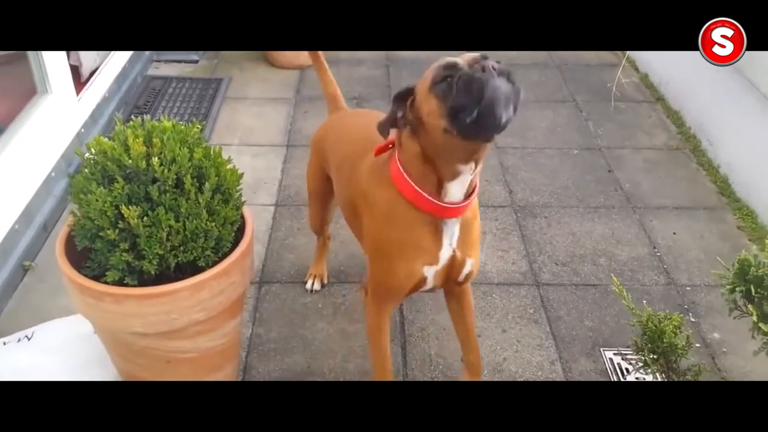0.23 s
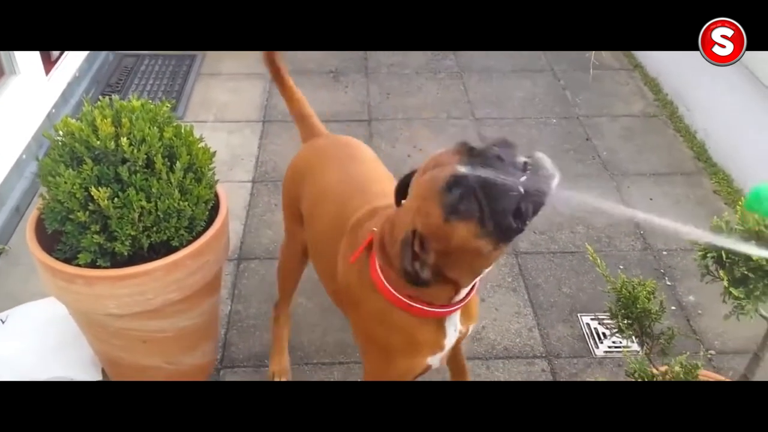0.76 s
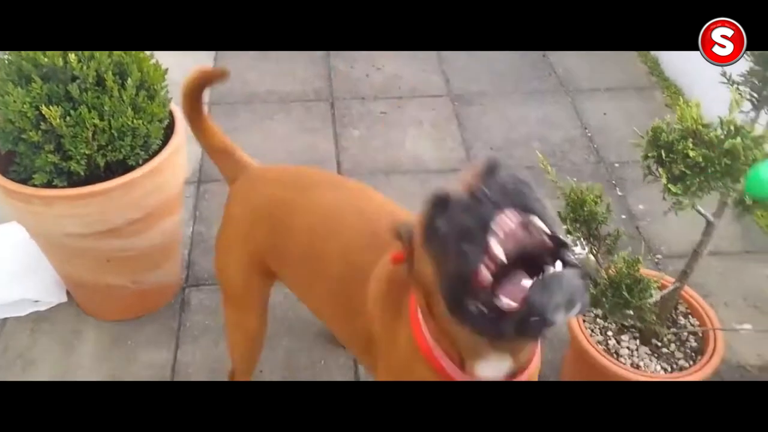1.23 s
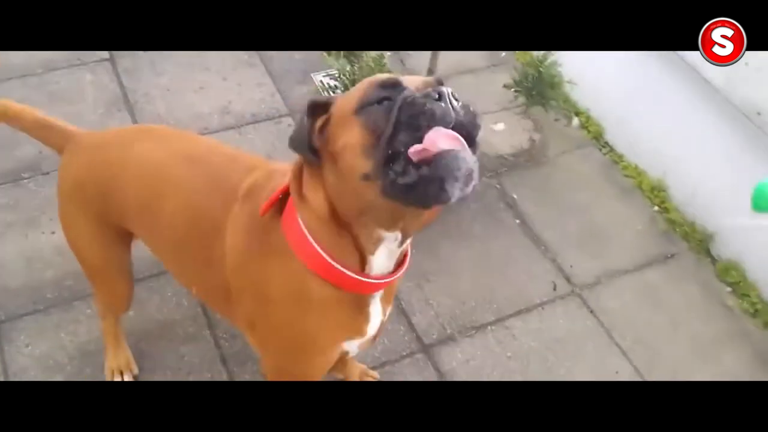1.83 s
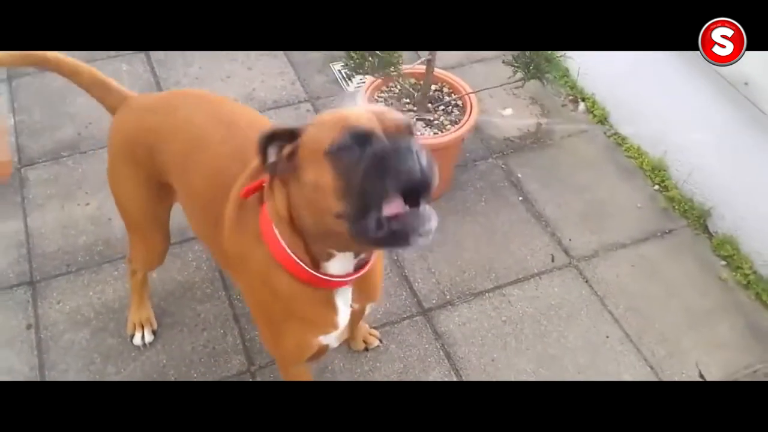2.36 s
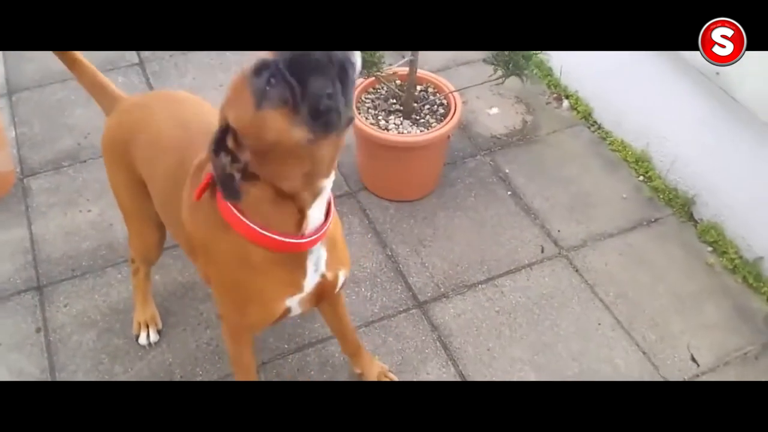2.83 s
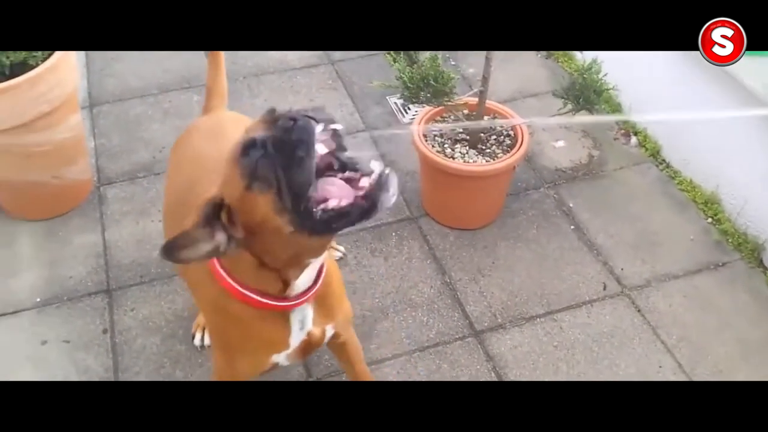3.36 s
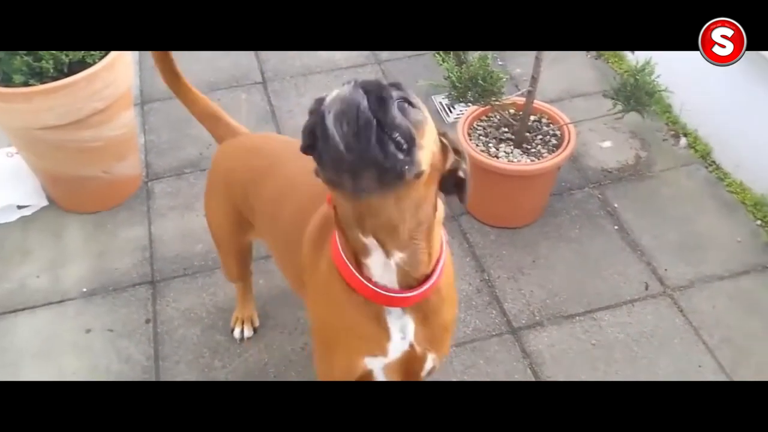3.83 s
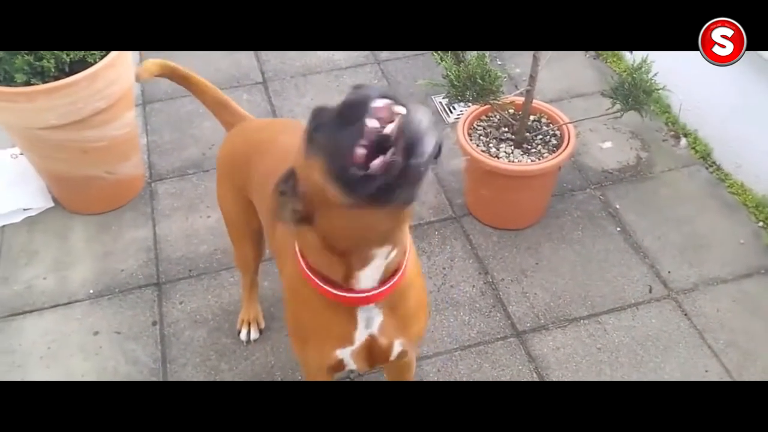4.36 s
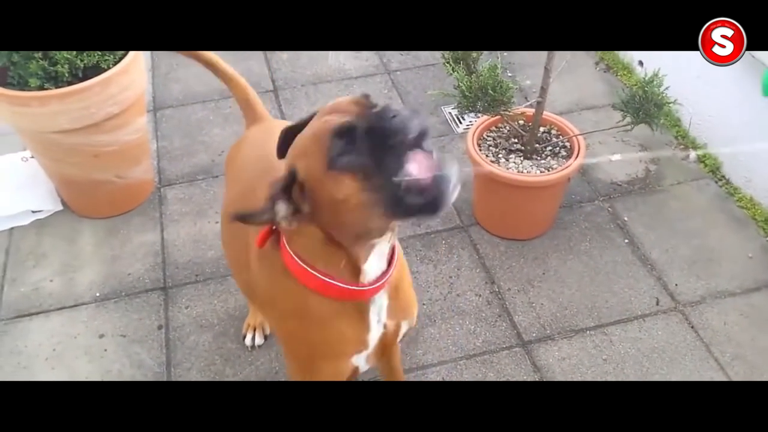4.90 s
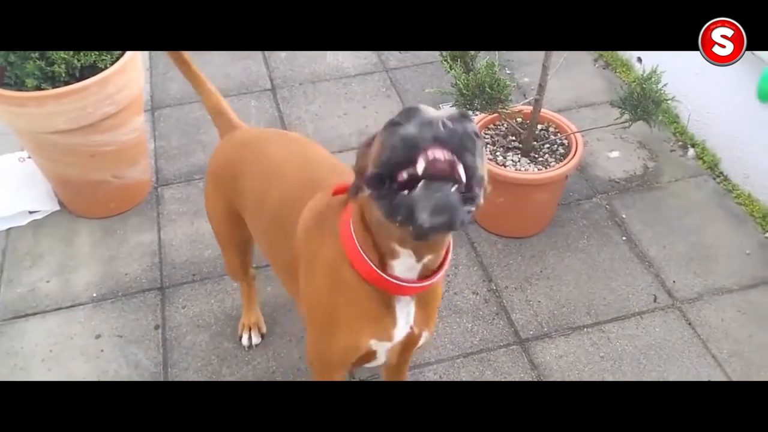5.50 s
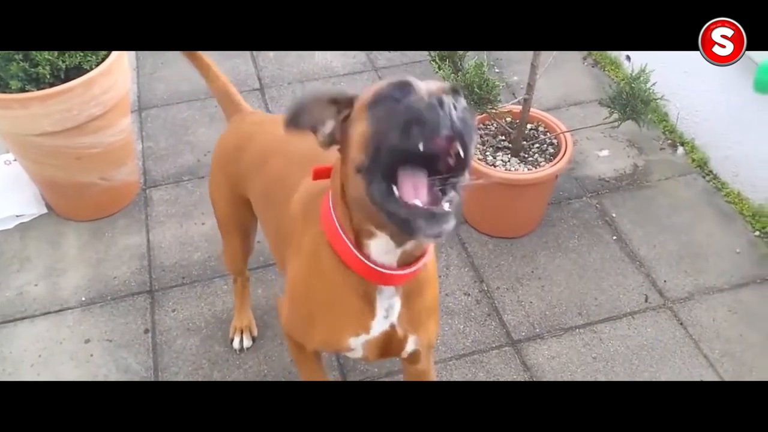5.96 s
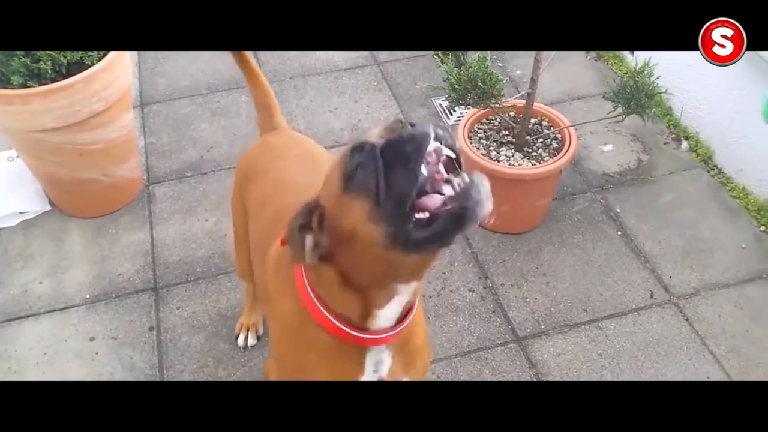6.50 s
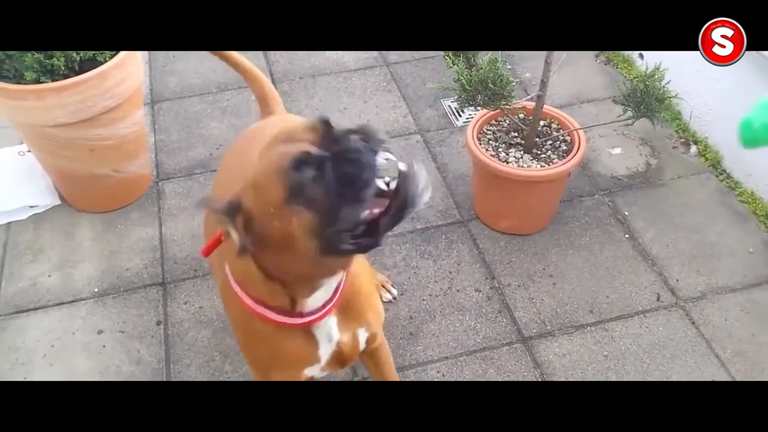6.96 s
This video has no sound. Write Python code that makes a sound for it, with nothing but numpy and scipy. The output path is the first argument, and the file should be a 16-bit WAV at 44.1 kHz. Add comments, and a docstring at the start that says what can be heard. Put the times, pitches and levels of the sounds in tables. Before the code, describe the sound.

Close by, a plastic trigger squirter fires quick hissing jets, each followed by a short suction squeak and hard clack. A dog's jowls clap and slosh at the water with hollow bubbly gulps and sharp wet ticks. Drops patter on patio slabs over a faint distant hum; soft wind bumps touch the microphone, mostly at left.

```python
"""On a paved patio a dog snaps at the jet of a trigger squirter, about three squirts a second.
Each squeeze clicks and hisses at the nozzle; the sprung piston returns, sucks water and clacks home.
The dog's jowls clap, slosh and spit: bubbles and noise ring the resonances of the mouth.
Water patters on the slabs over a distant hum, and a breeze bumps the microphone.
Turbulence is shaped noise, impacts excite decaying modes, and a diffuse tail answers from the walls."""
import sys
import numpy as np
from scipy import signal
from scipy.fft import rfft, irfft, next_fast_len
from scipy.io import wavfile
from scipy.ndimage import uniform_filter1d, map_coordinates

SR = 44100
rng = np.random.default_rng(int(sys.argv[2]) if len(sys.argv) > 2 else 0)


def bounce(signal):
    """Save signal as a 16-bit WAV file at the path given by the first command-line argument."""
    frames = np.transpose(np.atleast_2d(signal))
    limited = np.clip(frames, -1, 1)
    pcm = np.round(limited * 32767).astype(np.int16)
    wavfile.write(sys.argv[1], SR, pcm)


N = 318402
TIME = np.arange(N) / SR
SIZE = next_fast_len(N + SR)
HZ = np.fft.rfftfreq(SIZE, 1 / SR)

# trigger squeezes: (start [s], relative hiss level from pressure [dB], relative trigger click level [dB],
# relative nozzle spit level [dB], delay of the valve's glug [s], glug level [dB])
SQUEEZES = [(-0.04, 1, -16, -28, 0.044, -25.5), (0.333, -1.5, -14, -11, 0.048, -26),
            (0.698, -2.5, -12, -18, .047, -43), (1.062, -3.5, -17, -13, 0.067, -36),
            (1.467, -3, -20, -29, .052, -31), (1.897, -3.5, -16, -7, .05, -33),
            (2.274, -1.5, -11.5, -9, 0.053, -30.5), (2.602, 1, -10.5, -6, 0.066, -42),
            (2.975, 1, -12, -24, 0.037, -33), (3.29, 1, -4.5, -16, 0.06, -26.5),
            (3.6, 3, -2.5, -11, .056, -23.5), (3.913, 4, -6.5, -8, 0.051, -22),
            (4.241, -2.5, -2, -9, 0.06, -35), (4.527, -1.5, -26, -10, 0.032, -38),
            (4.82, 2, -19, -12, 0.036, -35), (5.109, -0.5, -8, -7, .04, -38),
            (5.381, 2.5, -9, -10, .047, -26.5), (5.634, 1, -5, -8, 0.043, -26.5),
            (5.879, -1, -7, -12, 0.055, -32), (6.12, -1, -21, -8, 0.042, -28),
            (6.363, 2, -24, -8, 0.042, -35), (6.602, -1, -13, -5, 0.036, -37),
            (6.827, 0, -21, -8, 0.054, -28), (7.059, -2, -7, -4.5, 0.052, -29)]
# trigger returns: (start [s], travel time [s], relative opening click level [dB],
# relative closing clack level [dB])
RETURNS = [(0.148, 0.018, -21.5, -19), (0.537, 0.023, -19, -19.5), (0.914, 0.025, -24.5, -22),
           (1.293, 0.03, -17.5, -19.5), (1.694, 0.021, -23, -23), (2.09, 0.025, -20.5, -24),
           (2.466, 0.022, -19, -21.5), (2.803, 0.022, -18, -19.5), (3.176, 0.021, -18, -20.5),
           (3.494, 0.021, -17, -18), (3.785, 0.035, -17.5, -18), (4.105, 0.026, -16, -21),
           (4.448, 0.021, -20, -21), (4.726, 0.02, -17, -18), (5.009, 0.019, -17.5, -16.5),
           (5.304, 0.016, -19.5, -24), (5.56, 0.021, -16, -19), (5.809, 0.02, -17, -18),
           (6.056, 0.021, -21, -18.5), (6.308, 0.016, -17, -19), (6.546, 0.022, -17.5, -20),
           (6.783, 0.021, -17, -22.5), (7.007, 0.018, -21, -23)]
# spectrum of hard contacts: (frequency [Hz], relative level [dB])
CONTACT_SPECTRUM = [(300, -30), (900, -1.5), (2000, 1), (3500, 7), (4400, 7), (6000, -4.5), (9500, 7),
                    (14000, -7.5)]
# left-right correlation of the squirter's noise: (frequency [Hz], correlation [0-1])
TOY_CORRELATION = [(900, 0.82), (3300, 0.49), (5000, 0), (7500, 0)]
CLICK_LIFE_S = .0012


def amp(db):
    """Logarithmic level: decibels become an amplitude ratio."""
    return 10 ** (np.asarray(db) / 20)


def unit(x):
    """Power normalisation: scale to rms 1."""
    return x / np.sqrt(np.mean(x ** 2) + 1e-20)


def along(points, hz):
    """Logarithmic frequency scale: interpolate (Hz, value) points on it."""
    f, v = np.transpose(points)
    return np.interp(np.log(hz + 1), np.log(f + 1), v)


def curve(rows):
    """Slow envelope: interpolate (time, value) rows at every sample."""
    s, values = np.transpose(rows)
    return np.interp(TIME, s, values)


def wobble(rate, reach=2):
    """Band-limited fluctuation: a smooth random curve with rate knots a second, clipped at reach."""
    knots = rng.standard_normal(int(N * rate / SR) + 4)
    return np.clip(map_coordinates(knots, [TIME * rate], order=2), -reach, reach)


def add(track, s, sound):
    """Superposition: sum a sound into a track from time s."""
    part = track[..., max(0, round(s * SR)):][..., :sound.shape[-1]]
    part += sound[..., :part.shape[-1]]


def body(spectrum):
    """Minimum phase: a folded cepstrum gives a causal response of mean power 1."""
    cepstrum = irfft(np.log(unit(amp(along(spectrum, HZ)))), SIZE)
    cepstrum[1:SIZE // 2] *= 2
    cepstrum[SIZE // 2 + 1:] = 0
    return np.exp(rfft(cepstrum))


def patchy(x, depth_db):
    """Spectral fluctuation: fleeting narrow bands rise and fall, so the colour keeps shifting."""
    z = signal.stft(x, nperseg=512)[2]
    field = uniform_filter1d(rng.standard_normal(z.shape[1:]), size=3, axis=0)
    field = uniform_filter1d(field, size=7, axis=1)
    coloured = signal.istft(z * amp(depth_db * unit(field)), nperseg=512)[1]
    return unit(coloured[:, :N])


def rush(level, spectrum, alike, grain_db, grain_rate, patchy_db):
    """Turbulence: grainy noise on a level curve excites a fixed body, partly correlated in stereo."""
    grain = unit(amp(grain_db * wobble(grain_rate)))
    drive = level * grain * patchy(rng.standard_normal((2, N)), patchy_db)
    # this rotation between mid and side gives the wanted correlation
    turn = np.arccos(np.clip(along(alike, HZ), 0, 1)) / 2
    shaped = rfft(drive, SIZE) * body(spectrum) * [np.cos(turn), np.sin(turn)]
    mid, side = irfft(shaped, SIZE)[:, :N]
    return np.array([mid + side, mid - side])


def blows(rows, life):
    """Impact envelope: each (s, dB) blow swells quickly and decays exponentially over life seconds."""
    attack_s = .0005
    level, t = np.zeros(N), np.arange(SR // 10) / SR
    for s, db in rows:
        add(level, s, amp(db) * np.exp(-t / life) * (1 - np.exp(-t / attack_s)))
    return level


def plop(hz, cycles, glide, attack_cycles):
    """Air cavity: a damped oscillation whose pitch slides as the cavity changes size."""
    turns = hz * np.arange(SR // 8) / SR
    shape = np.exp(-turns / cycles) * (1 - np.exp(-turns / attack_cycles)) ** 2
    pitch = hz * (1 + glide * np.tanh(turns / cycles - 1))
    return shape / shape.max() * np.sin(2 * np.pi * np.cumsum(pitch) / SR)


def cavity(x, hz, q):
    """Simple resonator: one peak that keeps the power of white noise."""
    b, a = signal.iirpeak(min(hz, SR / 3), max(q, .7), SR)
    return signal.lfilter(b, a, x) / np.sqrt(b[0])


def moving_cavity(x, hz, q):
    """Time-varying resonator: shift the pitch curve to zero frequency, smooth, and shift back."""
    turn = np.exp(2j * np.pi * np.cumsum(hz) / SR)
    pole = np.exp(-np.pi * hz.mean() / (q * SR))
    return (turn * signal.lfilter([1], [1, -pole], x / turn)).real


def droplets(level, hz, cycles, count):
    """Drop impacts: tiny decaying rings at random times, each of its own pitch, size and place."""
    start = rng.integers(0, N, count)
    pitch, size, place = rng.standard_normal((3, count, 1))
    n = np.arange(SR // 200)
    turns = np.minimum(hz * np.exp(.45 * pitch), SR / 3) * n / SR
    rings = amp(1.74 * np.minimum(size, 2)) * np.exp(-turns / cycles) * np.sin(2 * np.pi * turns)
    index = (start[:, None] + n).ravel()
    channels = [np.bincount(index, (rings * amp(side * place)).ravel(), N)[:N] for side in (-3, 3)]
    return level * unit(np.array(channels))


def plastic(rows, tilt_db, damping):
    """Modal vibration: each (s, dB) blow excites the head's modes anew; tilt is in dB per octave."""
    # modes of the plastic head: (frequency [Hz], relative level [dB], t60 at damping 1 [s])
    modes = [(920, -9, 0.029), (1556, -1.5, 0.026), (2793, 5.5, 0.055), (3416, 6.5, 0.049),
             (4290, -1, 0.023), (5050, -2, 0.041), (5270, 2.5, 0.021), (7030, -3.5, 0.024),
             (10200, -8, 0.0067), (9500, 15, 0.0052)]
    out, t = np.zeros(N), np.arange(SR // 16) / SR
    hz, db, t60 = np.transpose(modes)[:, :, None]
    for s, blow_db in rows:
        strength, detune, phase = rng.standard_normal((3, len(modes), 1))
        gain = amp(db + 6.1 * strength + tilt_db * np.log2(hz / 3000))
        decay = amp(-60 * damping * t / t60)
        tones = np.sin(2 * np.pi * (hz * (1 + 0.017 * detune) * t + phase))
        ring = (gain / np.linalg.norm(gain) * decay * tones).sum(0)
        add(out, s, amp(blow_db) * ring * (1 - np.exp(-t / 0.00027)))
    return out


def squeezes():
    """Pressure-driven jet noise: it builds to a crest, sags and collapses, with a sizzle on top."""
    # spectrum of the water jet: (frequency [Hz], relative level [dB])
    jet_spectrum = [(300, -10), (520, -18.5), (750, 5), (950, 6), (1300, 3.5), (2400, -0.5), (3400, 11),
                    (3900, 4.5), (4700, 9), (5800, 5.5), (7500, 7.5), (10000, -3)]
    # spectrum of the fine sizzle: (frequency [Hz], relative level [dB])
    sizzle_spectrum = [(4000, -56), (7000, -8), (8700, 1), (9800, 1.5), (10900, -6), (11700, 4),
                       (13000, -4.5), (14400, -8), (14900, -37), (15700, -6)]
    # the jet is louder while the nozzle is held nearer: (time [s], relative level [dB])
    jet_level = [(0, -41.5), (1.3, -38), (2.8, -42.5), (3.7, -35.5), (4.8, -35.5), (5.8, -37.5), (7.2, -38)]
    hold_s = 0.072  # the piston bottoms out and the squirt ends this long before the trigger is let go
    spit_s, crest_s = 0.037, 0.09  # after the start: the nozzle spits, the pressure crests
    fastest_rise_s = 0.0052  # for a 0 dB click; a gentler pull builds more slowly
    fall_s, tail_s = 0.02, 0.021
    nozzle_hz = 9940

    jet, sizzle, glugs = np.zeros((3, N))
    let_go = [s for s, *_ in RETURNS] + [N / SR + hold_s]
    for (s, pressure_db, click_db, _, delay, glug_db), end in zip(SQUEEZES, let_go):
        length = max(end - hold_s - s, .1)
        crest = min(crest_s, length - fall_s - .002)
        rise = min(fastest_rise_s * amp(-click_db / 2), spit_s)
        knots = s + np.array([-.003, rise, spit_s, crest, length - fall_s, length + fall_s, length + tail_s])
        jet += amp(np.interp(TIME, knots, [0, 4, 2.0, 3.5, 1.1, -2, -53], -120, -120))
        sizzle_db = np.interp(TIME, knots, [-30, -10, -9.5, 0.8, -3, -12, -42], -120, -120)
        sizzle += amp(-26 + pressure_db + sizzle_db)
        glug = plop(950 * np.exp(rng.normal(0, 0.033)), cycles=3.3, glide=0.063, attack_cycles=0.66)
        add(glugs, s + delay, amp(glug_db) * glug)
    jet *= amp(curve(jet_level) + wobble(16))

    # a narrow hiss at the nozzle wanders in pitch
    wandering_hz = nozzle_hz * np.exp(0.091 * wobble(13))
    nozzle = amp(-4.5) * sizzle * unit(moving_cavity(rng.standard_normal(N), wandering_hz, q=19))
    spits = [(s + spit_s + rng.normal(0, 0.0022), db) for s, _, _, db, *_ in SQUEEZES]
    sizzle += blows(spits, CLICK_LIFE_S)

    water = rush(jet * amp(1.44 * wobble(70)), jet_spectrum, TOY_CORRELATION,
                 grain_db=3.5, grain_rate=450, patchy_db=4)
    mist = rush(sizzle * amp(-1.26 + 1.1 * wobble(110)), sizzle_spectrum, TOY_CORRELATION,
                grain_db=4.0, grain_rate=1200, patchy_db=1.0)
    spatter = droplets(amp(-5) * jet, hz=4300, cycles=5, count=3200)
    spatter += droplets(amp(-14.5) * sizzle, hz=9400, cycles=2.7, count=1800)

    trigger = [(s, db) for s, _, db, *_ in SQUEEZES]
    clicks = rush(amp(-5) * blows(trigger, CLICK_LIFE_S), CONTACT_SPECTRUM, TOY_CORRELATION,
                  grain_db=1.5, grain_rate=1400, patchy_db=2.5)
    ring = amp(-14.0) * plastic(trigger, tilt_db=7, damping=2.7)
    return water + mist + nozzle + spatter + clicks + ring + glugs


def outdoors():
    """Random drop impacts: each squirt rains onto the slabs after its flight, over a steady distant hum."""
    # patter level as the slabs get wetter: (time [s], relative level [dB])
    wetness = [(0, -38), (0.6, -36), (1.0, -39.5), (1.4, -37), (1.8, -39.5), (2.25, -44), (2.7, -36),
               (3.4, -36.5), (3.75, -36), (4.2, -34), (4.7, -39), (5.1, -37), (5.7, -31.5), (6.3, -36),
               (6.7, -32), (7.2, -36.5)]
    # spectrum of the patter: (frequency [Hz], relative level [dB])
    patter_spectrum = [(500, -8.5), (1500, -6.5), (3200, -2.5), (4500, -1.5), (6500, -1), (9500, 0.5),
                       (14000, -9.5)]
    # spectrum of the hum: (frequency [Hz], relative level [dB])
    hum_spectrum = [(20, -17), (45, -3.5), (110, -1.5), (250, -1), (450, -10), (850, -5), (1500, -13.5),
                    (4000, -31)]
    flight_s, landing_db = 0.22, 4
    landing = sum(np.exp(-((TIME - s - flight_s) / 0.065) ** 2) for s, *_ in SQUEEZES)
    level = amp(curve(wetness) + landing_db * landing)
    patter = rush(level, patter_spectrum, [(1000, 0.034)], grain_db=3, grain_rate=800, patchy_db=2.5)
    drops = droplets(amp(-18) * level, hz=3600, cycles=3, count=1500)
    hum = rush(amp(-46), hum_spectrum, [(200, 1.0), (1500, 0.39)],
               grain_db=3, grain_rate=64, patchy_db=3.5)
    return amp(-9.0) * patter + drops + hum


def breeze():
    """Wind turbulence: gusts swell over calm air, stronger at the left port, and eddies bump it."""
    # gusts: (crest [s], relative rumble level [dB], rise time constant [s], fall time constant [s])
    gusts = [(1.87, -27.5, 0.038, 0.092), (2.18, -28, 0.037, 0.021), (3.34, -35.5, 0.029, 0.052),
             (3.96, -23.5, 0.058, 0.064), (4.39, -23, 0.14, 0.33), (5.3, -36.5, 0.056, 0.24),
             (5.73, -38, 0.12, 0.79), (6.12, -35, 0.1, 0.17), (6.85, -42, 0.35, 0.58)]
    # the strongest eddies: (time [s], relative peak level [dB], central frequency [Hz], left over right [dB])
    puffs = [(1.718, -22.5, 132, 21), (2.188, -20, 112, 22), (3.91, -15.5, 164, 30), (3.98, -16.5, 90, 28),
             (4.09, -16, 131, 11), (4.273, -22.5, 112, 16), (4.319, -28, 106, -4), (4.388, -15, 124, -7),
             (4.437, -18, 126, 3), (4.472, -16.5, 116, -5), (4.624, -12.5, 156, 24),
             (4.642, -18.5, 182, 16), (6.076, -17.5, 127, 22), (6.145, -20.5, 101, 30)]
    # spectrum of the rumble: (frequency [Hz], relative level [dB])
    rumble_spectrum = [(20, -22), (50, -1.5), (110, -1.5), (200, -12), (400, -25.5), (1000, -58.5)]
    calm_db = -52.5
    swells = [amp(db) * np.exp(np.minimum((TIME - s) / rise, (s - TIME) / fall))
              for s, db, rise, fall in gusts]
    strength = np.maximum(amp(calm_db), np.max(swells, axis=0))
    wind = rush(strength, rumble_spectrum, [(100, 0.18)], grain_db=3.0, grain_rate=130, patchy_db=2.5)
    bumps = np.zeros((2, N))
    for s, db, hz, left_db in puffs:
        share = amp([[left_db], [0]])
        bump = plop(hz, cycles=.7, glide=-.2, attack_cycles=.4)
        add(bumps, s - .003, amp(db) * share / share.mean() * bump)
    return wind * amp([[.8], [-2.7]]) + bumps


def crackle(per_s, noise_share):
    """Poisson-like impulses: equal bursts at random moments over some noise, at rms 1."""
    chance, sign = rng.random(N), rng.choice([-1, 1], N)
    bursts = unit(sign * (chance < per_s / SR))
    return np.sqrt(1 - noise_share) * bursts + np.sqrt(noise_share) * rng.standard_normal(N)


def jaws():
    """Cavity resonance: bubbles ring the closing mouth at a climbing pitch; jowls clap and fling spray."""
    # jowls clapping shut on air and water: (time [s], relative clap level [dB], mouth cavity frequency [Hz],
    # its decay time [s], relative slosh level [dB], slosh length scale [s], climb in pitch [octaves],
    # relative spray level [dB])
    claps = [(0.049, -23, 395, 0.0049, -40, 0.018, 0, -49),
             (0.525, -27.5, 272, 0.0032, -47, 0.013, 0.028, -51),
             (0.81, -16.5, 209, 0.0044, -54, 0.01, 0.13, -36), (1.22, -24, 236, .004, -52, 0.021, 0, -56),
             (1.235, -21, 232, 0.0042, -56, 0.033, 0.16, -60),
             (1.351, -17, 466, 0.0035, -43.5, 0.028, 0.57, -45),
             (1.495, -21.5, 537, .003, -47, 0.11, 0.033, -48),
             (1.523, -26, 312, 0.0036, -48.5, 0.034, 0, -51),
             (1.768, -26, 496, 0.0025, -43, 0.022, 0.06, -47.5),
             (1.817, -21, 730, .003, -39, 0.018, 0.05, -39.5),
             (1.873, -25.5, 920, 0.0033, -36, 0.011, 0, -62),
             (2.046, -28.5, 786, 0.0037, -52, 0.0065, 0.19, -70),
             (2.196, -33, 242, .003, -48, 0.033, 0.21, -46),
             (2.759, -29, 670, 0.0028, -38.5, 0.035, 0.13, -37),
             (2.921, -26, 696, 0.0026, -35, 0.05, 0, -43),
             (3.602, -12.5, 980, 0.0022, -26, 0.009, 0.16, -50),
             (3.714, -21, 367, .003, -36, 0.012, 0.7, -37),
             (4.173, -26.5, 490, 0.0022, -37, 0.014, 0.47, -51),
             (4.466, -13.5, 640, .002, -24, 0.014, 0.47, -26.5),
             (5.494, -6.5, 954, 0.0036, -26.5, 0.036, 1.1, -31.5),
             (6.377, -9, 1113, 0.0018, -29, 0.04, 0.08, -29.5),
             (7.168, -16.5, 336, 0.0016, -40, 0.042, 0.22, -33),
             (7.193, -9, 920, .0016, -28, 0.033, 0.87, -29.5),
             (7.214, -9, 960, .0018, -26, 0.013, 0.073, -28)]
    # slurps with open jaws: (middle [s], relative level [dB], mouth cavity frequency [Hz], length scale [s])
    slurps = [(0.096, -41.5, 690, 0.015), (0.837, -41.5, 740, 0.062), (1.589, -49, 304, 0.046),
              (2.412, -35.5, 930, 0.0048), (3.232, -48.5, 345, 0.044), (4.045, -37, 794, 0.017),
              (4.141, -40, 1300, 0.027), (4.334, -39, 760, 0.024), (4.491, -42, 603, 0.012),
              (4.94, -41, 765, 0.031), (5.206, -34.5, 680, 0.023), (5.476, -30.5, 333, 0.013),
              (5.752, -40, 724, 0.021), (5.936, -37.5, 711, 0.011), (6.234, -36.5, 955, 0.026),
              (6.489, -33, 906, 0.019), (6.63, -36.5, 704, 0.019), (6.729, -34, 830, 0.033)]
    # spectrum of the spray: (frequency [Hz], relative level [dB])
    spray_spectrum = [(900, -18), (1700, -6), (2500, -3), (3300, -12), (5000, -4), (12000, -8.5)]
    # left-right correlation of the spray: (frequency [Hz], correlation [0-1])
    spray_correlation = [(300, 0.55), (1200, 0.66), (3000, 1), (9000, 0.16)]
    lips_hz = 2504  # the gap between lips and teeth rings above the mouth cavity
    throat_hz = 270  # the space behind the tongue rings lower
    closing_s, spray_lag_s = 0.023, 0.001  # the jaws close before a clap; the spray flies after it
    relaxed_hz, spray_db_per_octave = 756, 13  # a tighter mouth rings higher and flings out more spray

    mouth, spray = np.zeros(N), np.zeros(N)
    for s, db, hz, ring, *_ in claps:
        hollow = plop(hz, cycles=hz * ring, glide=0.085, attack_cycles=0.27)
        add(mouth, s - .001, amp(db - 4.0) * hollow)
        gap = plop(lips_hz * np.exp(rng.normal(0, 0.079)), cycles=7.0, glide=0.027, attack_cycles=0.38)
        add(mouth, s - .001, amp(db - 11.5) * (hz / 1000) ** 2 * gap)

    bubbles = crackle(per_s=420, noise_share=.15)
    # every clap is wrapped in a slosh
    sloshes = [(s, db, hz, length, climb, wet_db) for s, _, hz, _, db, length, climb, wet_db in claps]
    for s, db, hz, length in slurps:
        wet_db = db - 3.5 + spray_db_per_octave * np.log2(hz / relaxed_hz)
        sloshes.append((s, db, hz, length, 0, wet_db))
    for s, db, hz, length, climb, wet_db in sloshes:
        ends = [int((s - 2 * length) * SR), int((s + 2 * length) * SR)]
        span = slice(*np.clip(ends, 0, [N - 1, N]))
        t = TIME[span] - s
        swell = np.exp(-(t / (0.76 * length * np.where(t < 0, 1, 0.7))) ** 2)
        pitch = hz * 2 ** (climb * np.clip(t / closing_s, -1, 0))
        hollow = unit(moving_cavity(moving_cavity(bubbles[span], pitch, q=7), pitch, q=1.3))
        throat = unit(cavity(cavity(bubbles[span], throat_hz, q=3.3), throat_hz, q=0.98))
        # the throat is strongest when the mouth is hollow, with a low pitch
        throat_gain = amp(-7) * (700 / hz) ** 1.53
        mouth[span] += amp(db + 1.0) * swell * (hollow + throat_gain * throat)
        spray[span] += amp(wet_db) * np.exp(-((t - spray_lag_s) / (0.64 * length)) ** 2)

    # a tight, high clap also cracks sharply
    cracks = [(s, db + 20 * np.log10(hz / 900)) for s, db, hz, *_ in claps]
    crack = amp(-17) * blows(cracks, CLICK_LIFE_S)
    splash = rush(amp(-4) * spray + crack, spray_spectrum, spray_correlation,
                  grain_db=4.5, grain_rate=430, patchy_db=5.0)
    lip_bubbles = cavity(crackle(per_s=450, noise_share=.1), lips_hz, q=2)
    lips = unit(moving_cavity(lip_bubbles, lips_hz * np.exp(.06 * wobble(25)), q=16))
    drops = droplets(amp(-3.5) * spray, hz=3060, cycles=4.8, count=2500)
    return mouth + splash + amp(-6) * spray * lips + drops


def lead_ins(rows, rise):
    """Exponential growth: the level swells over rise seconds up to each (s, dB) blow."""
    level, t = np.zeros(N), np.arange(SR // 20) / SR
    for s, db in rows:
        add(level, s - t[-1], amp(db) * np.exp(-t[::-1] / rise))
    return level


def releases():
    """Spring return: a click, a thin whistle of suction with slips, then a clack that bounces once."""
    # spectrum of the pump: (frequency [Hz], relative level [dB])
    pump_spectrum = [(150, -34), (450, -39), (700, 0), (980, -16.5), (1250, 3.5), (1650, -6.5),
                     (2200, -0.5), (3400, 1.5), (3750, -2.5), (4250, 1.5), (5900, -4), (9900, -1),
                     (12500, -8.5), (14400, -22.5)]
    valve_lag_s, bounce_s = 0.0031, 0.0045
    suction_db = -13  # relative to the clack
    suction, whistle = np.zeros(N), np.zeros(N)
    for s, travel, _, db in RETURNS:
        t = np.arange(int(travel * SR)) / SR
        draw = amp(db + suction_db) * (1 - np.exp(-t / 0.00073)) * np.sqrt(1 - t / travel)
        add(suction, s + valve_lag_s, draw)
        tone = unit(cavity(rng.standard_normal(len(t)), hz=4250, q=41))
        add(whistle, s + valve_lag_s, draw * tone)

    clicks = [(s, db) for s, _, db, _ in RETURNS]
    clacks = [(s + travel - .001, db) for s, travel, _, db in RETURNS]
    bounces = [(s + bounce_s * rng.uniform(0.611, 1.7), db + 0.5) for s, db in clacks]
    # the piston slips about a third and four fifths of the way
    slips = [(s + travel * (way + rng.normal(0, 0.105)), db - 4)
             for s, travel, _, db in RETURNS for way in (.32, .8)]
    strikes = amp(7.5) * blows(clicks, CLICK_LIFE_S) + amp(5.5) * blows(slips + bounces, CLICK_LIFE_S)
    sharp = rush(strikes, CONTACT_SPECTRUM, TOY_CORRELATION, grain_db=1.5, grain_rate=1500, patchy_db=2.5)
    ring = amp(6) * plastic(clicks, tilt_db=9, damping=1.3)
    ring += amp(5.5) * plastic(clacks + bounces, tilt_db=-1.5, damping=2.26)

    # the trigger scrapes as the finger eases off
    scrape = amp(-13) * lead_ins(clicks, rise=0.003)
    pump_level = amp(5.5) * suction + amp(-1.0) * blows(clacks, life=0.0079) + scrape
    rattle = rush(pump_level, pump_spectrum, TOY_CORRELATION, grain_db=0.5, grain_rate=770, patchy_db=5.0)

    # both ends of the travel also thump the air in the pump chamber
    chamber = np.zeros(N)
    for contacts, share_db in (clicks, -10), (clacks, -3):
        for s, db in contacts:
            hz = 975 * np.exp(rng.normal(0, 0.029))
            thump = plop(hz, cycles=5.7, glide=0.0067, attack_cycles=0.34)
            add(chamber, s + 0.00089, amp(db + share_db) * thump)
    return sharp + rattle + ring + whistle + chamber


def wet_clicks():
    """Film rupture: a water film bursts, fizzes for a moment and rings the small air pocket behind it."""
    # wet clicks and spits: (time [s], relative peak level [dB], pocket frequency [Hz], fizz decay time [s])
    films = [(0.236, -24, 4580, 0.0047), (0.504, -24, 2400, 0.0015), (0.776, -1.5, 9130, 0.0078),
             (0.915, -4, 8500, .001), (1.13, -13, 9750, .0007), (1.264, -21, 10500, .001),
             (1.624, -4, 11700, 0.00071), (2.991, -15, 4830, 0.0022), (3.021, -2.5, 9400, 0.002),
             (3.338, -4, 9000, 0.00069), (3.479, -14, 1930, 0.0022), (3.783, -0.5, 4330, 0.0011),
             (4.072, -10.5, 5430, 0.0019), (4.152, -11.5, 5550, 0.0015), (4.418, -17.5, 2520, 0.0033),
             (4.832, -16.5, 2170, 0.00082), (5.218, -3.5, 3440, 0.0023), (5.244, -7.5, 2330, 0.0015),
             (5.521, -9.5, 3070, 0.0035), (5.619, -16.5, 1920, 0.002), (5.787, -18, 1180, 0.0023),
             (5.903, -16, 2600, .001), (6.973, -14, 5000, 0.0033)]
    out, t = np.zeros((2, N)), np.arange(SR // 30) / SR
    for s, db, hz, life in films:
        fizz = .13 * rng.standard_normal((2, len(t))) * np.exp(-t / life)
        burst = (t == 0) + fizz
        tick = cavity(cavity(burst, hz, q=10), hz, q=.7)
        add(out, s - .0005, amp(db - 8.5) * tick / np.abs(tick).max(axis=1, keepdims=True))
    return out


def ports(x, lead_ms):
    """Interaural-style delay: a phase slope brings the sound to the left port before the right."""
    shift = np.exp(np.outer([1, -1], 1j * np.pi * HZ * lead_ms / 1000))
    return irfft(rfft(x, SIZE) * shift, SIZE)[:, :N]


def patio(x):
    """Diffuse reverberation: slabs and walls answer with a short decaying tail, different at each port."""
    # reverberation time: (frequency [Hz], t60 [s])
    decay_times = [(200, 0.18), (1000, 0.11), (3000, 0.15), (10000, 0.075)]
    hz, t, z = signal.stft(rng.standard_normal((2, SR // 3)), SR, nperseg=256)
    t60 = np.maximum(along(decay_times, hz), .02)[:, None]
    tail = signal.istft(z * amp(-60 * t / t60), SR, nperseg=256)[1]
    tail = np.pad(tail / np.linalg.norm(tail[0]), ((0, 0), (SR // 200, 0)))  # 5 ms before the tail
    return signal.fftconvolve(x, tail, axes=1)[:, :N]


def scene():
    """Superposition: squirter nearer the left port, dog, one wall echo of the dog, patio and weather."""
    toy = ports(squeezes() + releases(), lead_ms=.18)
    weather = outdoors() + breeze()
    dog = jaws() + wet_clicks()
    wall = np.zeros((2, N))
    add(wall, .0088, amp(-18) * dog)  # the nearest wall returns the dog's sounds once
    return toy + dog + wall + patio(amp(-9) * toy + amp(-6) * dog) + weather


def record(dry):
    """Linear filtering: the left port is dull, the top treble rolls off and the band ends sharply."""
    # shading of the left port: (frequency [Hz], gain [dB])
    left_shading = [(3000, -1), (4500, 3), (6500, -2), (7600, -5), (9000, -14), (11000, -17),
                    (14000, -13.5)]
    # treble roll-off of both ports: (frequency [Hz], gain [dB])
    treble = [(14400, 0.5), (14900, -28), (15700, -12)]
    top_hz = 15900
    shading = np.array([amp(along(left_shading, HZ)), np.ones(len(HZ))])
    colour = shading * amp(along(treble, HZ)) * (HZ < top_hz)
    return irfft(rfft(dry, SIZE) * colour, SIZE)[:, :N]


dry = scene()
out = record(dry)
bounce(out)
```